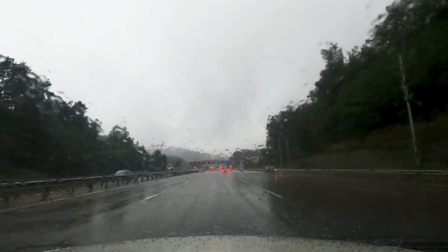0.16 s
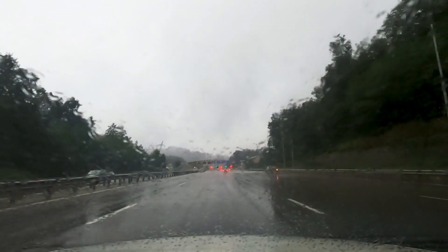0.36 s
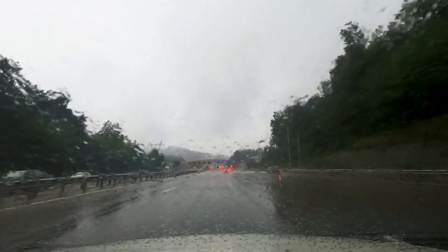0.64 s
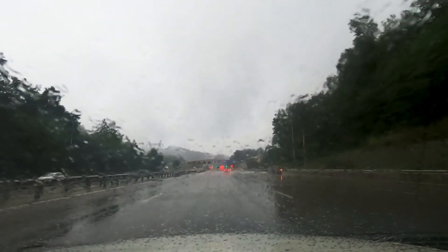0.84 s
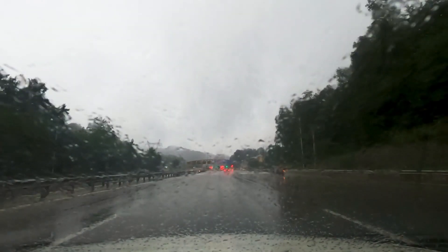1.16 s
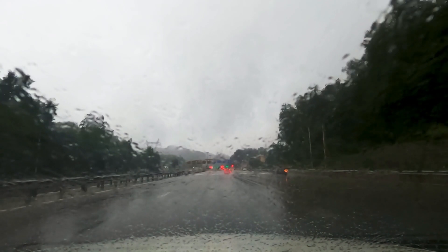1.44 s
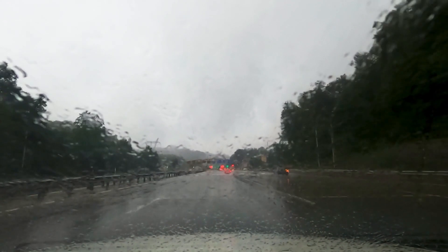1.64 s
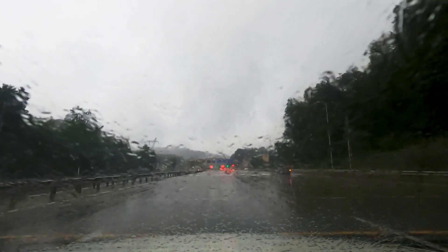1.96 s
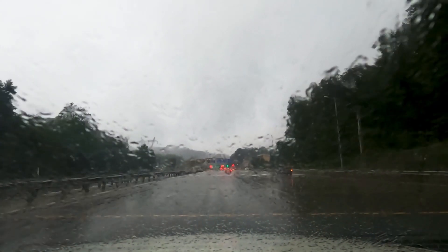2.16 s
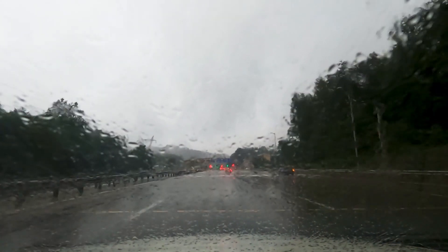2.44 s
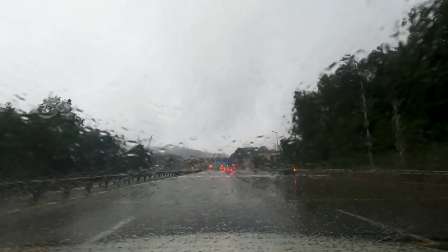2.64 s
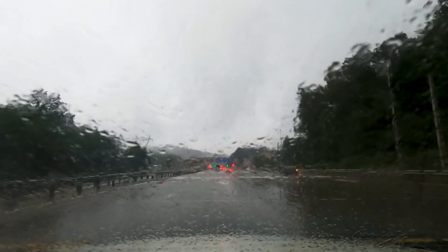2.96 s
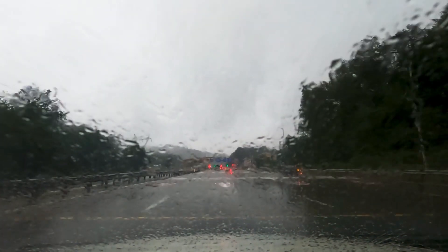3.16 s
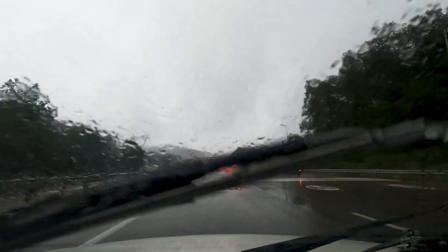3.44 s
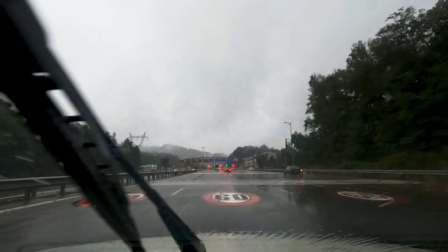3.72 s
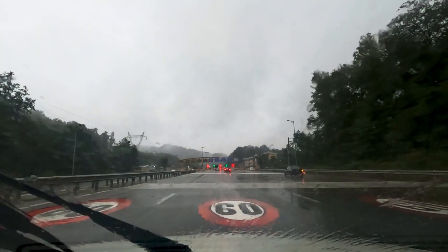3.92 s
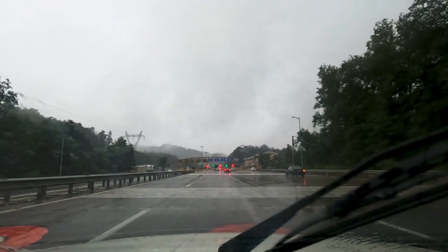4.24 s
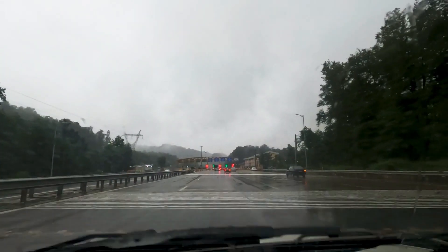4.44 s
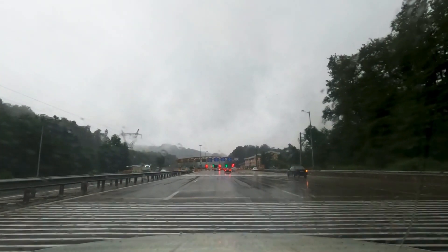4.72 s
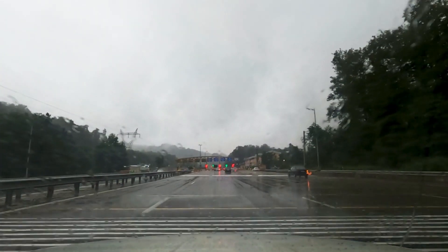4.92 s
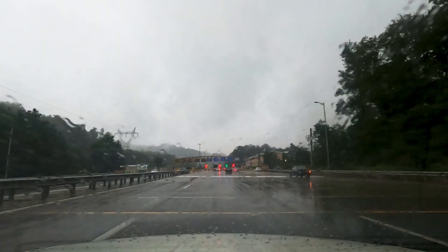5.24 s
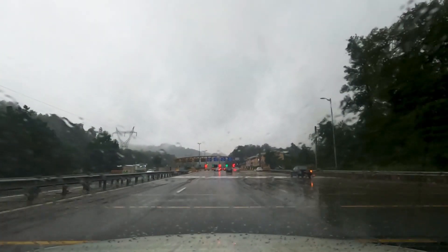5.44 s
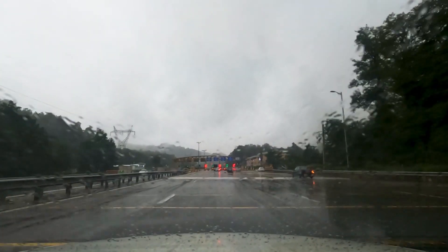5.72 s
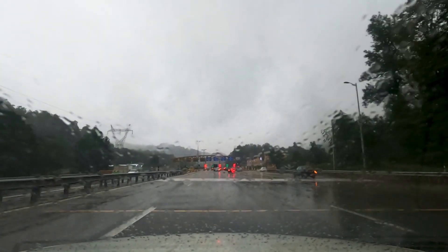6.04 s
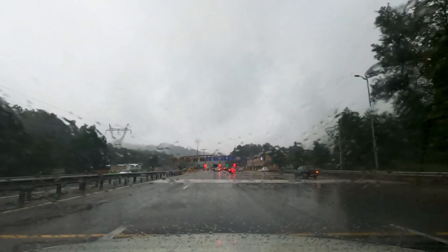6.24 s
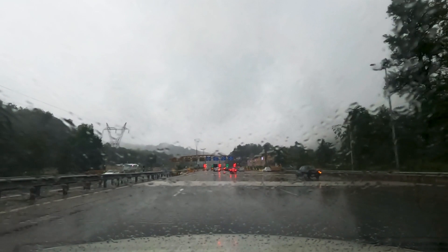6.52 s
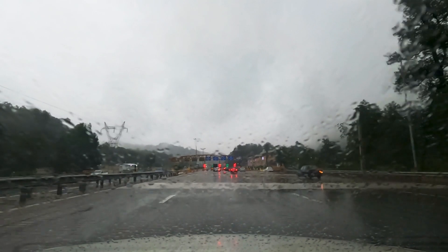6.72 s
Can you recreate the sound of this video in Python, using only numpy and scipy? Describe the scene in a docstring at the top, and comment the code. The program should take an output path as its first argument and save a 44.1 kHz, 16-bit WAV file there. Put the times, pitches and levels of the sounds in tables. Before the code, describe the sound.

A loud, low rumble fills the cabin of a gently slowing car on a wet road, heard from just behind the windscreen. Engine boom, tyre roar and faint spray run together, swelling over small bumps. Around 3.3 seconds the engine sinks to a hum. From 3.4 to 4 seconds the wipers make one sweep, rubbing and juddering on wet glass, with arm knocks at 3.5 and 3.9 and a tiny squeak at the turn. From 3.5 seconds on, scattered fat raindrops tick on the glass close by, one clearly at 4.5. At 5.1 seconds the tyres thump onto grooves and drum with a loud, low buzz until 5.8, while loose plastic trim chatters with faint metallic chinks. The road noise then drops a little. At about 6.4 seconds the engine boom returns, lower in pitch, with a few more bumps and drops until the end near 6.9.

```python
"""Slowing car on a wet highway

Microphone in the cabin, just behind the windscreen, in light rain. The engine's boom sinks under
body rumble, tyre roar and spray; drops tick on the glass close by. The wipers rub and judder
through one sweep, then the tyres drum over a patch of transverse grooves that sets the cabin
trim rattling, and roll onto quieter asphalt."""
import sys
import numpy as np
from scipy import signal
from scipy.fft import rfft, irfft, next_fast_len
from scipy.io import wavfile
from scipy.ndimage import uniform_filter1d

SR = 44100
rng = np.random.default_rng(int(sys.argv[2]) if len(sys.argv) > 2 else 0)


def to_wav(sig):
    """Store sig (one row per channel, or 1-D mono) as 16-bit WAV at the path in sys.argv[1].

    Samples outside -1..1 are clipped; the rate is SR.
    """
    pcm = np.clip(np.atleast_2d(sig), -1, 1) * 32767
    pcm = np.round(pcm).astype(np.int16)
    wavfile.write(sys.argv[1], SR, pcm.T)  # frames by channels


N = 302967

# the road from inside: body shake, cabin drone, tread roar, spray (frequency [Hz], relative level [dB])
SHAKE_COLOUR = [(5, -15.5), (14, -9), (22, -4.5), (26, -7), (35, 1.5), (46, -7), (60, -10), (80, -14.5),
                (110, -37), (250, -70.5)]
DRONE_COLOUR = [(40, -27), (70, -13.5), (98, -6.5), (122, 1.5), (145, -3.5), (170, -10), (205, -8.5),
                (230, -13), (260, -10.5), (310, -13), (390, -21.5), (600, -58)]
ROAR_COLOUR = [(250, -25), (380, -5.5), (440, 1.5), (485, 0.5), (560, -3), (720, -3), (800, -9.5),
               (920, -9.5), (1120, -10.5), (1400, -16.5), (1650, -17.5), (2000, -22), (3000, -30),
               (8000, -57.5)]
SPRAY_COLOUR = [(900, -24), (1900, -4.5), (2700, -3), (3800, -4.5), (5000, -9), (6800, -16), (8000, -21.5),
                (10000, -29.5), (12000, -45.5), (16000, -51)]
# level changes on each stretch of road (start [s], shake [dB], drone [dB], roar [dB], spray [dB])
SURFACES = [(0, 2.5, 0, -1, 0.5), (5.21, 5, 1.5, -2.5, -3), (5.74, 1, -2.5, -6.5, -6),
            (6.17, -1, -2, -3.5, -3.5)]
# level lost as the car slows (shake [dB/s], drone [dB/s], roar [dB/s], spray [dB/s])
SLOWING_LOSS = [0.46, 0.49, 0.54, 0.17]
# bumps and coarse patches (time [s], rise [s], fall [s], shake lift [dB], drone lift [dB])
BUMPS = [(.3, .2, 0.31, -1.5, 2), (.72, 0.076, 0.061, 2.5, 0), (1.25, 0.31, 0.52, 2.5, 1.08),
         (2.22, 0.07, 0.31, 3, 3), (2.86, 0.043, 0.051, 9.5, -2), (3.24, 0.12, 0.09, 5, -1.5),
         (3.36, 0.052, 0.075, -2, 4), (3.56, 0.058, 0.12, 8, 0), (3.9, 0.066, 0.032, 7, 0),
         (4.25, 0.19, 0.16, -2, 0.5), (4.66, 0.23, 0.15, 5.5, 1.5), (4.9, 0.051, 0.018, 2, 6.5),
         (6.09, 0.016, 0.058, 6.5, 1.5), (6.45, 0.11, 0.069, 4.5, 2), (6.68, 0.026, 0.19, 8.5, 2)]
# wetter stretches (time [s], rise [s], fall [s], spray lift [dB])
PUDDLES = [(.75, 0.36, 0.59, 2.5), (2.15, .45, .5, 1.06), (4.55, 0.26, .55, 1.5)]
# the engine's boom fades to a hum and returns at low revs (time [s], base level [dB])
BOOM = [(0, -24.5), (2.6, -24), (3.25, -25.5), (3.65, -32), (4.5, -31.5), (4.8, -36), (6.25, -39),
        (6.42, -27.5), (6.87, -28)]

# harmonics of the tyres drumming on grooves (multiple of the groove rate, relative level [dB])
DRUM_HARMONICS = [(1, 2.5), (2, -2), (3, -5.5), (5, -18.5)]
# one groove's knock (frequency [Hz], relative level [dB])
KNOCK_COLOUR = [(60, -27), (120, 3.5), (160, -3), (200, -0.5), (265, -8.5), (340, -22.5), (450, -20.5),
                (900, -41.5)]
# the hardest jolts of the suspension (time [s], relative peak [dB])
THUMPS = [(5.102, -10.5), (5.132, -12.5), (5.219, -21), (5.497, -17.5)]
# fits of chatter in the loose trim (time [s], rise [s], fall [s], level [dB])
CHATTER_FITS = [(5.14, 0.062, 0.18, -41), (5.385, 0.08, 0.16, -35.5), (5.495, 0.047, 0.067, -39.5),
                (5.715, 0.06, 0.034, -41)]
# knocks of the loose trim, about one to a groove (time [s], relative peak [dB])
CLACKS = [(5.3188, -41), (5.3372, -36), (5.367, -31), (5.3916, -35), (5.4175, -32), (5.444, -37.5),
          (5.4699, -31.5), (5.4855, -34.5), (5.4984, -29.5), (5.516, -37), (5.6258, -39), (5.6516, -35),
          (5.6785, -38), (5.709, -36.5), (5.735, -42)]
# a trim panel and a dry tick of plastic (frequency [Hz], relative level [dB])
TRIM_COLOUR = [(250, -28), (450, 2), (700, 6.5), (950, 3), (1300, -3.5), (1650, -7.5), (2200, -20),
               (3400, -25), (4500, -29), (8000, -40), (12000, -57)]
CLACK_COLOUR = [(300, -14.5), (700, 4.5), (1600, 11.5), (2200, 0), (2850, 1), (3400, -7.5), (4500, -26),
                (8000, -28), (12000, -52)]
# touches of a small metal part (time [s], peak [dB])
CHINKS = [(5.162, -62), (5.3973, -57), (5.419, -54), (5.4245, -59), (5.4975, -54), (5.505, -51),
          (5.5255, -53), (5.5498, -60), (5.658, -67), (5.7109, -70)]
# its modes (frequency [Hz], relative level [dB], t60 [s])
METAL_MODES = [(6400, -11, .018), (6620, -4, .022), (6800, 0, .036), (6960, -12, .04), (7300, -15, .018),
               (8200, -14, .022)]

# rubber sliding on wet glass (time [s], rise [s], fall [s], rub [dB], scrape [dB], swish [dB])
RUBS = [(3.382, 0.026, 0.015, -39, -40, -53), (3.4, 0.009, 0.009, -33, -34, -60),
        (3.43, 0.015, 0.05, -37, -45, -66), (3.76, 0.13, 0.079, -38, -41.5, -53.5),
        (3.87, 0.013, 0.024, -32, -53, -55), (3.92, 0.03, 0.053, -33.5, -42.5, -54)]
# the blades stick and slip
# (time [s], rise [s], fall [s], slip rate [Hz], glide [Hz/s], low groan [dB], bright rasp [dB])
JUDDERS = [(3.46, 0.018, 0.03, 228, 655, -28, -55), (3.742, 0.04, 0.034, 357, 100, -37.5, -38),
           (3.79, 0.022, 0.023, 175, 60, -29.5, -37), (3.84, 0.044, 0.038, 371, 10.5, -48, -43.5),
           (3.925, 0.018, 0.026, 245.9, -600, -21, -46), (3.975, 0.013, 0.018, 250, 199, -22, -52)]
# the rubbing, the swept water, the blade's bulk, an arm's knock (frequency [Hz], relative level [dB])
RUB_COLOUR = [(120, -27), (250, 12), (450, 12.5), (700, 10.5), (820, 5.5), (1080, 1.5), (1400, -3),
              (1750, -10), (2200, -23.5), (3000, -32), (4500, -35), (8000, -48.5), (12000, -59.5)]
SWISH_COLOUR = [(1000, -11), (2100, 15), (3000, -1), (3900, 2.5), (5000, -7), (8000, -20), (12000, -32)]
BLADE_COLOUR = [(100, -15), (160, 7.5), (250, -0.5), (350, -4), (480, -13.5), (900, -40)]
ARM_COLOUR = [(150, -5), (300, 7.5), (700, 10), (1400, -8), (2200, -9), (3200, -16), (4800, -37),
              (9000, -54)]
# resonances of the pressed blade and of its edge (frequency [Hz], width [Hz], relative level [dB])
SCRAPE_MODES = [(740, 130, 0.5), (1040, 92, 3.5), (1320, 67, -10), (1625, 38, -10.5)]
EDGE_MODES = [(478, 60, 2), (684, 90, 0), (1070, 110, 2), (1230, 80, -1), (1400, 110, -2), (1850, 60, -8),
              (2170, 110, -8), (2590, 60, -14), (2910, 60, -9), (3620, 80, -13)]
# what the windscreen passes of scrape and rasp (frequency [Hz], relative level [dB])
THROUGH_GLASS = [(200, -12), (400, 0), (1400, 0), (3000, -6), (6000, -28)]
# the edge sings as it judders and flips (time [s], rise [s], fall [s], pitch [Hz], level [dB])
SINGING = [(3.82, 0.1, 0.097, 2925, -59), (3.92, 0.003, 0.0045, 2634, -40.5)]
# the wiper arms knock as their load shifts (time [s], peak [dB])
ARM_KNOCKS = [(3.4993, -22.5), (3.9165, -25)]

# fat drops on the windscreen (time [s], peak [dB], tick pitch [Hz], tick t60 [s])
DROPS = [(3.4982, -31, 2950, 0.018), (3.8988, -34, 3100, .008), (4.504, -32, 3460, 0.017),
         (5.1944, -40, 3500, 0.022), (5.272, -39.5, 2500, .025), (5.297, -40, 3450, .025),
         (5.369, -40.5, 3350, .025), (5.394, -37, 3330, .025), (6.194, -47, 4050, 0.03),
         (6.265, -40, 3500, 0.013), (6.328, -48, 1100, .012), (6.816, -44, 1500, .008)]
# thin splashes of water (time [s], peak [dB])
SPLASHES = [(3.265, -61), (3.747, -60), (6.245, -59), (6.305, -63)]
# a tap on the glass and a splash (frequency [Hz], relative level [dB])
GLASS_COLOUR = [(300, -8), (700, 5), (1600, 4), (2300, 0.5), (3400, -7), (4800, -25), (8000, -37),
                (12000, -54)]
SPLASH_COLOUR = [(2500, -11), (5000, 3), (8300, 0), (10000, -6), (12500, -19), (15000, -30)]
# cabin standing waves that cancel at the microphone (frequency [Hz], width [Hz], cancelled part [dB])
CABIN_NULLS = [(394.5, 19, -6.5), (515, 30, -3), (840, 21, -9.5), (1014, 38, -15.5), (2100, 100, -17.5)]


def road(shake_db=-25, drone_db=-26, roar_db=-38, spray_db=-61, wet_share=0.64):
    """Road texture shakes the body and drones all round the microphone; treads roar and throw spray."""
    shake_change, drone_change, roar_change, spray_change = rolling()
    shake_lift, drone_lift = bumps()
    wet_lift = lift(PUDDLES)
    shake = amp(shake_db + shake_change + shake_lift) * steady(colour(hiss(), SHAKE_COLOUR), span=0.063)
    drone_gain = amp(drone_db + drone_change + drone_lift + 0.37 * wander(8.7))
    drone = drone_gain * steady(colour(hiss(), DRONE_COLOUR), span=0.11)
    roar_gain = amp(roar_db + roar_change + wet_share * wet_lift + 0.21 * wander(20))
    roar = roar_gain * unit(colour(hiss(), ROAR_COLOUR))
    spray_gain = amp(spray_db + spray_change + wet_lift + 0.6 * wander(14))
    spray = spray_gain * unit(colour(hiss(), SPRAY_COLOUR))
    return shake + drone + roar + spray


def rolling(blend_s=0.1):
    """Changes in dB of shake, drone, roar and spray with the surface and the falling speed."""
    starts, *columns = np.transpose(SURFACES)
    stretch = np.searchsorted(starts[1:], clock())
    return [uniform_filter1d(db[stretch], int(blend_s * SR)) - loss * clock()
            for db, loss in zip(columns, SLOWING_LOSS)]


def bumps():
    """Decibels that the bumps add to the shake and to the drone."""
    s, rise, fall, *columns = np.transpose(BUMPS)
    return [lift(zip(s, rise, fall, db)) for db in columns]


def engine(start_hz=76.64, idle_hz=29.97, run_down_s=6.9, octave_db=-16, bump_share=0.66):
    """Up front, the firing booms into the cabin, swells on bumps and sinks as the car coasts."""
    t = clock()
    firing_hz = idle_hz + (start_hz - idle_hz) * np.exp(-t / run_down_s)
    angle = 2 * np.pi * cycles(firing_hz, jitter=0.009, jitter_hz=14)
    shake_lift, _ = bumps()
    db = np.interp(t, *np.transpose(BOOM)) + bump_share * shake_lift + 1.2 * wander(5.9)
    return amp(db) * unit(np.sin(angle) + amp(octave_db) * np.sin(2 * angle))


def grooves(start_s=5.086, end_s=5.78, attack_s=0.0146, groove_hz=38.97, sag_hz_per_s=2.52,
            drum_db=-17, knock_db=-26.5, knock_hold_s=0.33, knock_fade_db_per_s=26.5):
    """Under the floor each groove kicks the tyres, which drum, knock and shake the trim."""
    since = clock() - start_s
    crossed = cycles((groove_hz - sag_hz_per_s * since) * (since > 0), jitter=0.006, jitter_hz=20.7)
    drum = np.zeros(N)
    for k, db in DRUM_HARMONICS:
        # front and rear axles drift in and out of step, so each harmonic wavers
        gain = amp(db + 1.8 * wander(8.3))
        drum += gain * np.sin(2 * np.pi * (k * crossed + rng.random()) + 0.24 * k * wander(19))
    kicks = clicks(crossed) * np.sqrt(SR / groove_hz) * amp(2 * wander(26))
    knocks = colour(kicks + 0.68 * hiss(), KNOCK_COLOUR)
    knock_gain = amp(knock_db - knock_fade_db_per_s * np.maximum(since - knock_hold_s, 0))
    tyres = amp(drum_db) * steady(drum, span=0.12) + knock_gain * steady(knocks, span=0.26)
    return held(start_s + attack_s, end_s, rise=attack_s, fall=0.063) * tyres + trim(crossed)


def trim(crossed, decay_grooves=0.43):
    """Loose plastic near the microphone chatters, shaken anew by every groove crossed."""
    shaking = 1.4 + np.exp(-(crossed % 1) / decay_grooves)
    chatter = hiss() * shaking * amp(wander(150))
    return bursts(CHATTER_FITS) * unit(colour(chatter, TRIM_COLOUR))


def jolts(thump_db=-2, clack_db=2):
    """The suspension thumps below; loose plastic and metal knock about in the cabin."""
    thumps = strikes(THUMPS, lambda: tap(KNOCK_COLOUR, t60=0.11, scatter=0.064))
    return amp(thump_db) * thumps + amp(clack_db) * strikes(CLACKS, clack) + strikes(CHINKS, chink)


def clack():
    """A dry tick of plastic and the duller ring of the panel that it strikes."""
    tick = tap(CLACK_COLOUR, t60=0.012, scatter=0.16)
    panel = tap(TRIM_COLOUR, t60=0.04, scatter=0.4)
    return tick / abs(tick).max() + panel / abs(panel).max()


def chink(uneven_db=2, attack_s=0.00065):
    """A small metal part rings briefly, a little differently at each touch."""
    t = np.arange(SR // 8) / SR
    tone = np.zeros(len(t))
    for hz, db, t60 in METAL_MODES:
        envelope = amp(db + uneven_db * rng.standard_normal()) * 0.0011 ** (t / t60)
        tone += envelope * np.sin(2 * np.pi * (hz * t + rng.random()))
    return tone * (1 - np.exp(-t / attack_s))


def wipers():
    """Just beyond the glass, rubber rubs, scrapes under load and sweeps water aside; the arms knock."""
    s, rise, fall, *columns = np.transpose(RUBS)
    rub_gain, scrape_gain, swish_gain = [bursts(zip(s, rise, fall, db)) for db in columns]
    grit = hiss() * amp(2.2 * wander(70))
    rub = rub_gain * unit(colour(grit, RUB_COLOUR))
    scrape = scrape_gain * steady(colour(ring(hiss(), SCRAPE_MODES), THROUGH_GLASS), span=0.015)
    water = hiss() * amp(2.6 * wander(150))
    swish = swish_gain * unit(colour(water, SWISH_COLOUR))
    blades = sum(judder(*row) for row in JUDDERS) + sum(singing(*row) for row in SINGING)
    knocks = strikes(ARM_KNOCKS, lambda: tap(ARM_COLOUR, t60=0.037, scatter=0.13))
    return rub + scrape + swish + blades + squeak() + knocks


def judder(s, rise, fall, hz, glide, groan_db, rasp_db):
    """The rubber grips and slips; each slip kicks both the blade's bulk and its edge."""
    slip_hz = np.clip(hz + glide * (clock() - s), hz / 2, 2 * hz)
    kicks = clicks(cycles(slip_hz, jitter=0.003, jitter_hz=70))
    slips = unit(kicks - slip_hz / SR) + 0.3 * hiss()  # kicks centred on zero, plus friction noise
    groan = steady(colour(slips, BLADE_COLOUR), span=0.1)
    rasp = steady(colour(ring(slips, EDGE_MODES), THROUGH_GLASS), span=0.1)
    return swell(s, rise, fall) * (amp(groan_db) * groan + amp(rasp_db) * rasp)


def singing(s, rise, fall, hz, db):
    """A thin, wavering ring of the blade's edge."""
    tone = np.sin(2 * np.pi * cycles(hz, jitter=0.02, jitter_hz=300))
    return amp(db) * swell(s, rise, fall) * unit(tone)


def squeak(start_s=3.917, length_s=0.072, pitch_hz=2590, rise_hz=380, slip_hz=245,
           level_db=-51, fade_db_per_s=26):
    """The rubber squeaks as it turns round, chopped by its slips and rising in pitch at the end."""
    since = np.clip(clock() - start_s, 0, length_s)
    hz = pitch_hz + rise_hz * (since / length_s) ** 4
    tone = np.sin(2 * np.pi * cycles(hz, jitter=0.012, jitter_hz=288))
    chop = (1 + 0.96 * np.sin(2 * np.pi * slip_hz * since)) * amp(2 * wander(120))
    envelope = held(start_s, start_s + length_s, rise=0.005, fall=0.008)
    return amp(level_db - fade_db_per_s * since) * envelope * tone * chop


def rain(patter_db=-79, drops_per_s=30):
    """A few fat drops tick on the windscreen, close up, among many faint ones; water fizzes past."""
    fat_drops = sum(strikes([(s, db)], lambda: drop(hz, t60)) for s, db, hz, t60 in DROPS)
    sizes = amp(3.3 * np.minimum(rng.exponential(1, N), 3))
    landings = rng.random(N) < drops_per_s / SR
    patter = amp(patter_db) * unit(colour(sizes * landings, GLASS_COLOUR))
    puff = signal.windows.hann(SR // 22)
    splashes = strikes(SPLASHES, lambda: colour(puff * rng.standard_normal(len(puff)), SPLASH_COLOUR))
    return fat_drops + patter + splashes


def drop(hz, t60, attack_s=0.00036):
    """A drop lands on the glass: a dry tap with a trace of pitch."""
    body = tap(GLASS_COLOUR, t60=0.037, scatter=0.14)
    t = np.arange(len(body)) / SR
    tick = np.sin(2 * np.pi * hz * t) * 1e-3 ** (t / t60) * (1 - np.exp(-t / attack_s))
    return body / abs(body).max() + 0.4 * tick


def tap(spectrum, t60, scatter):
    """A click and its quickly dying scatter in a panel."""
    t = np.arange(SR // 10) / SR
    burst = scatter * rng.standard_normal(len(t)) * 0.0015 ** (t / t60)
    burst[0] += 1
    return colour(burst, spectrum)


def strikes(rows, blow):
    """Places a fresh blow() at every (time [s], peak [dB])."""
    track = np.zeros(N)
    for s, db in rows:
        sound, rest = blow(), track[round(s * SR):]
        rest[:len(sound)] += (amp(db) * sound / abs(sound).max())[:len(rest)]
    return track


def ring(x, modes):
    """Passes x through parallel resonances (frequency [Hz], width [Hz], level [dB])."""
    return sum(amp(db) * signal.lfilter(*signal.iirpeak(hz, hz / width, SR), x)
               for hz, width, db in modes)


def colour(x, spectrum):
    """Causal filter through the points (frequency [Hz], level [dB]), rolling off above the last."""
    hz, db = np.transpose(spectrum)
    size = next_fast_len(len(x) + 8192, True) // 2 * 2
    log_hz = np.log(np.fft.rfftfreq(size, 1 / SR) + 1)
    beyond = np.maximum(log_hz - np.log(hz[-1]), 0)
    gain_db = np.maximum(np.interp(log_hz, np.log(hz), db) - 40 * beyond, -110)
    # minimum phase: nothing rings ahead of a blow
    cepstrum = irfft(np.log(amp(gain_db)))
    cepstrum[1:size // 2] *= 2
    cepstrum[size // 2 + 1:] = 0
    return irfft(rfft(x, size) * np.exp(rfft(cepstrum)))[:len(x)]


def held(start, end, rise, fall):
    """Envelope that rises to 1 at start, holds until end and dies away."""
    t = clock()
    early, late = np.minimum(t - start, 0) / rise, np.maximum(t - end, 0) / fall
    return np.exp(-np.minimum(early ** 2 + late ** 2, 50))


def swell(s, rise, fall):
    """Envelope that peaks at 1 at time s."""
    return held(s, s, rise, fall)


def lift(rows):
    """Decibels added by swells (time [s], rise [s], fall [s], lift [dB])."""
    return sum(db * swell(s, rise, fall) for s, rise, fall, db in rows)


def bursts(rows):
    """Gain of overlapping bursts (time [s], rise [s], fall [s], level [dB]), summed by power."""
    return np.sqrt(sum((amp(db) * swell(s, rise, fall)) ** 2 for s, rise, fall, db in rows))


def cycles(hz, jitter, jitter_hz):
    """Running count of cycles of a slightly uneven rate."""
    return np.cumsum(hz * (1 + jitter * wander(jitter_hz))) / SR


def clicks(turns):
    """One click for each whole cycle."""
    return np.diff(np.floor(turns), prepend=0)


def wander(rate_hz):
    """Random drift, mostly slower than rate_hz, rms 1."""
    return unit(irfft(rfft(hiss()) / (1 + (np.fft.rfftfreq(N, 1 / SR) / rate_hz) ** 4), N))


def steady(x, span):
    """Evens out swells longer than span seconds, leaving rms near 1."""
    size = max(int(span * SR), 8)
    power = uniform_filter1d(uniform_filter1d(x ** 2, size), size)
    return x / np.sqrt(abs(power) + 1e-12)


def hiss():
    """White noise."""
    return rng.standard_normal(N)


def clock():
    """The time of every sample in seconds."""
    return np.arange(N) / SR


def amp(db):
    """Decibels to gain."""
    return 10 ** (np.asarray(db) / 20)


def unit(x):
    """Scales to rms 1."""
    return x / np.sqrt(np.mean(x ** 2) + 1e-20)


def scene():
    """Everything at one microphone behind the windscreen, notched by the cabin's standing waves."""
    cabin = road() + engine() + grooves() + jolts() + wipers() + rain()
    return (cabin - ring(cabin, CABIN_NULLS))[None]


def record(dry):
    """The recorder cuts the treble above 15.7 kHz."""
    low_pass = signal.firwin(511, 15700, window=("kaiser", 9), fs=SR)
    return signal.oaconvolve(dry, low_pass[None], "same")


dry = scene()
out = record(dry)
to_wav(out)
```